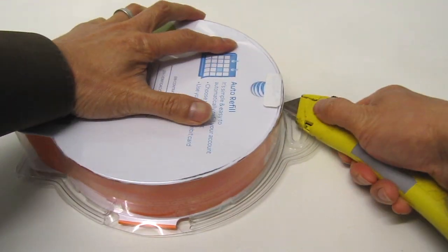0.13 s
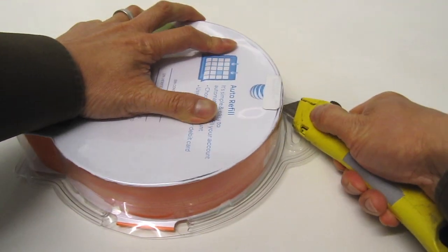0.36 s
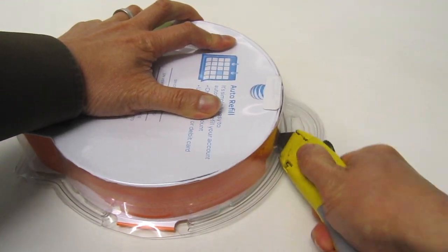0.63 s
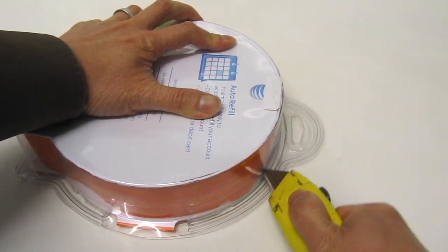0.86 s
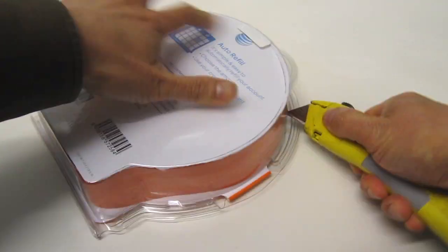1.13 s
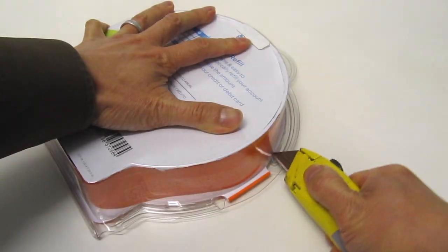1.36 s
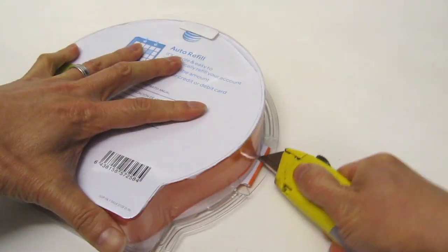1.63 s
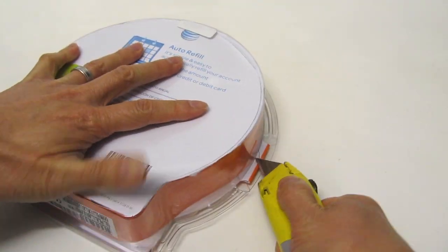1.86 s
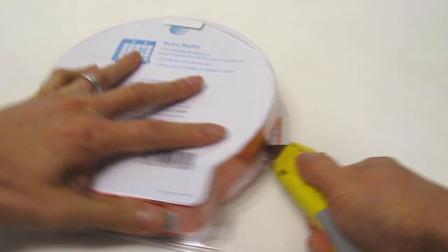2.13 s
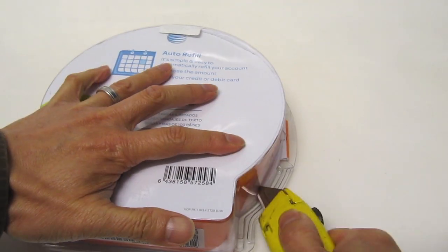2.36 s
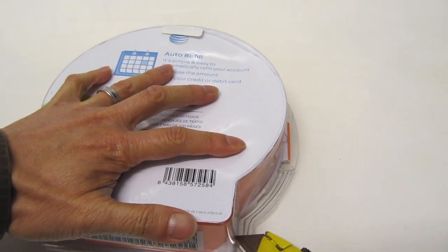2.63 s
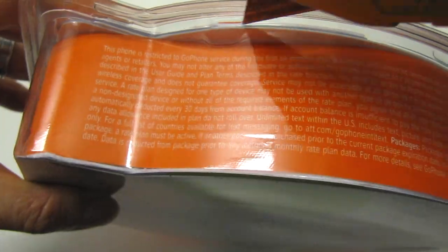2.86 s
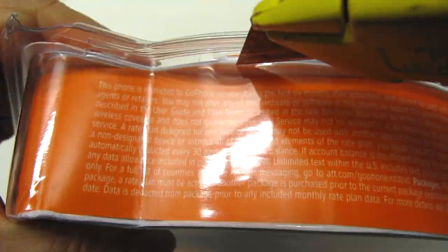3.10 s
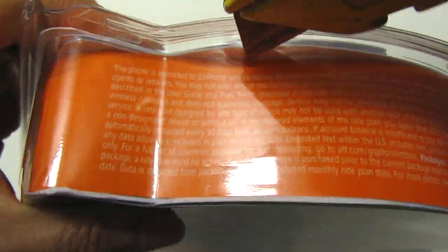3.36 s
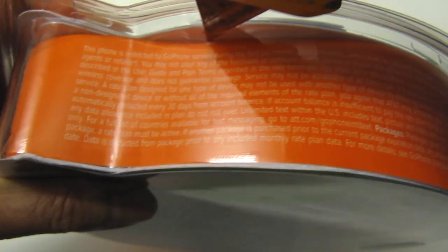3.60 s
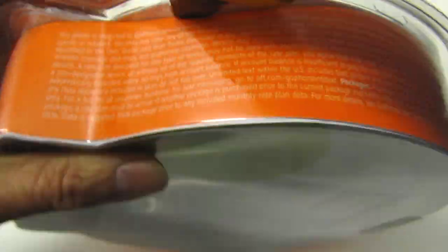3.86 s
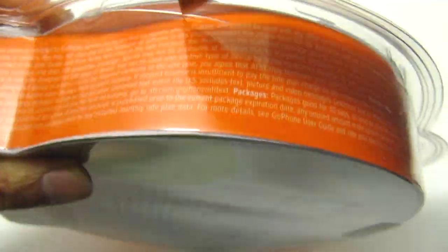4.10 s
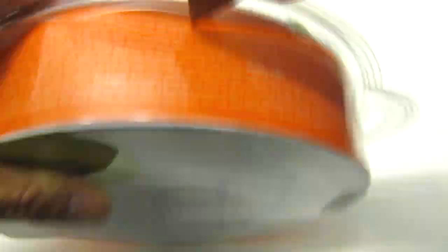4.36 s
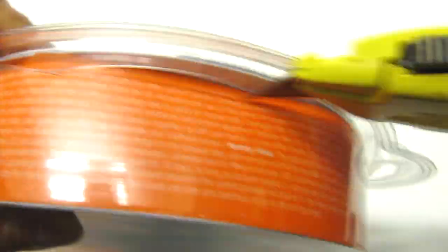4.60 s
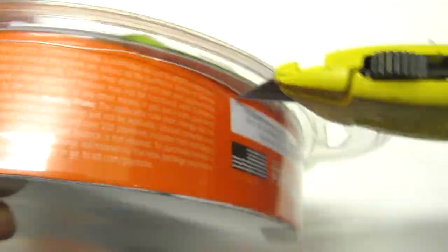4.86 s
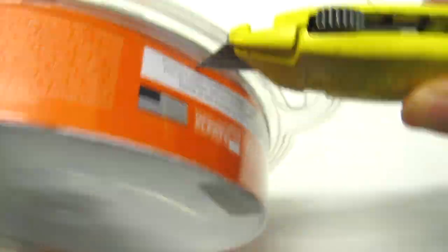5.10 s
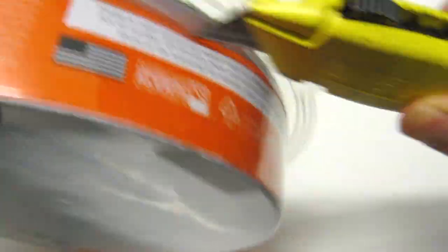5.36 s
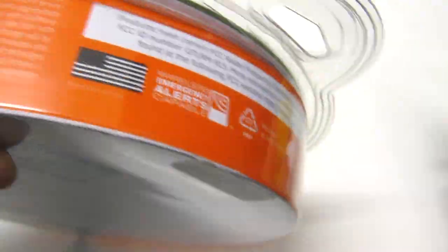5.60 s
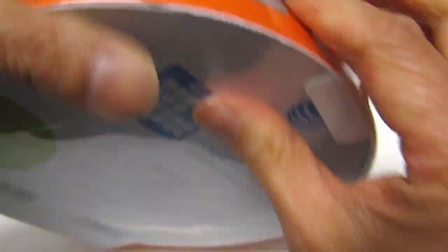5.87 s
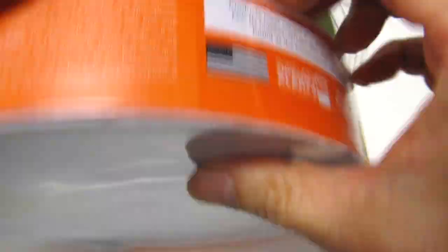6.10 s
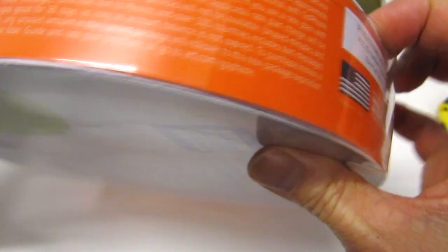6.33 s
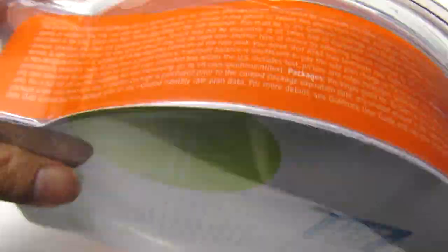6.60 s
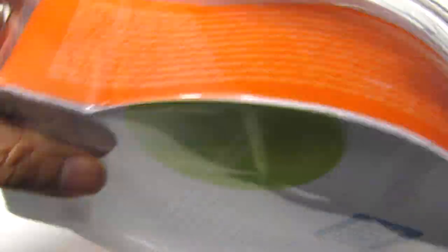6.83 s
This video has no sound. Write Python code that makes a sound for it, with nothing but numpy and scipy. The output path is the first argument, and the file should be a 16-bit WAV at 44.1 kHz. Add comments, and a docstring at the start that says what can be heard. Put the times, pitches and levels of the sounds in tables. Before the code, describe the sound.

Close, dry mono sound of stiff clamshell plastic being cut indoors. Isolated bright cracks with quiet gaps give way to a loud snap cluster, then increasingly frequent clicks and pops. Late on, a short wavering stick-slip squeak leads into a tiny rising whistle, dense crackling, gritty strokes and another very brief squeak. Light rustling, small bumps and soft room rumble continue throughout.

```python
"""A utility knife is worked through a hard plastic clamshell package close to a mono microphone.
Separate snaps and juddering clicks, bursts of fracture noise ringing a damped shell, come first; then
scrapes of filtered grit and low sine knocks join them. After more snapping the blade squeaks as a train of
slip pulses, whistles upward as a sine sweep and squeaks again amid dense snaps and a last scrape.
Throughout lie noise rumble, hums and hiss of a quiet room, and the rustle, ticks and bumps of handling."""
import sys
import numpy as np
from scipy import signal
from scipy.fft import rfft, irfft, next_fast_len
from scipy.io import wavfile
from scipy.ndimage import uniform_filter1d

SR = 44100
rng = np.random.default_rng(int(sys.argv[2]) if len(sys.argv) > 2 else 0)


def how_loud(loudness_db):
    """Turn decibels into a plain amplitude multiplier (0 dB gives 1, 20 dB gives 10)."""
    steps = np.asarray(loudness_db, float) / 20
    return 10 ** steps


def store_pcm(level_fs):
    """Save levels as 16-bit WAV."""
    pcm = np.round(np.clip(level_fs, -1, 1) * 32767).astype(np.int16)
    wavfile.write(sys.argv[1], SR, np.atleast_2d(pcm).T)


N = 307377

# Colour of plastic rubbed by hand or blade. Each row: frequency in Hz, relative level in dB.
RUSTLE_COLOUR = [(90, -21), (280, 11), (650, -2), (1000, -0.5), (2600, 2), (4300, -8.5), (8000, -29.5)]
# Colour of the bright hiss in scrapes and background. Each row: frequency in Hz, relative level in dB.
HISS_COLOUR = [(1500, -32.5), (4000, -1.5), (6000, -1.5), (9700, 5), (12000, -5.5), (15500, -26.5),
               (16000, -45)]


def evened(x):
    """Scales to rms 1."""
    return x / np.sqrt(np.mean(x ** 2) + 1e-20)


def add(mix, s, sound):
    """Mixes a sound in at s seconds."""
    part = mix[round(s * SR):][:len(sound)]
    part += sound[:len(part)]


def coloured(x, points):
    """Filters by a spectrum of (Hz, dB) points, then scales to rms 1."""
    size = next_fast_len(len(x) + 512)
    point_hz, point_db = np.transpose(points)
    hz = np.fft.rfftfreq(size, 1 / SR)
    gain = how_loud(np.interp(np.log(hz + 1), np.log(point_hz), point_db))
    return evened(irfft(rfft(x, size) * gain, size)[:len(x)])


def lumps(size, span_s, depth_db):
    """A randomly wandering gain."""
    span = max(round(span_s * SR), 1)
    wander = uniform_filter1d(uniform_filter1d(rng.standard_normal(size), span), span)
    return how_loud(depth_db * evened(wander))


def random_hits(per_s, spread_db):
    """Impulses of random size at random moments, per_s a second on average."""
    size = how_loud(spread_db * np.minimum(rng.exponential(1, N), 2.5))
    return size * (rng.random(N) < per_s / SR)


def snap(thud_db, crack_db, tear_s=0.00095, tear_db=-5, shake_s=0.0045, shake_db=-21):
    """One break, smaller fractures and a shudder ring the heavily damped shell; the ring peaks near 1."""
    # What the shell rings with. Each row: nominal frequency in Hz, level in dB before
    # scaling by 1/sqrt(t60), t60 in seconds.
    shell_modes = [(490, -18, 0.0019), (1103, 3.5, 0.012), (2185, 3.5, 0.0017), (2894, -2, 0.0016),
                   (4536, 2, 0.0016), (6820, -2, 0.0029), (8570, 10, 0.0012), (12600, -44, 0.0018)]
    boom_nominal_hz, boom_db, boom_t60 = 327, -14, .04  # the hollow package booms under each thud
    hz, db, t60 = np.transpose(shell_modes)[:, :, None]
    t = np.arange(1800) / SR

    hz_here = hz * (1 + .09 * rng.standard_normal(hz.shape))  # each spot is tuned differently
    modes = (how_loud(db - 60 * t / t60) / np.sqrt(t60) * np.sin(2 * np.pi * hz_here * t)).sum(0)

    tear = how_loud(tear_db) * np.exp(-t / tear_s)
    shudder = how_loud(shake_db) * np.exp(-t / shake_s)
    fractures = rng.standard_normal(len(t)) * (tear + shudder)
    fractures *= 1 - np.exp(-t / .0003)  # the tear gathers before it gives
    fractures[14] = -1  # the main break
    ringing = signal.fftconvolve(modes, fractures)[:len(t)]

    # thud, ring and crack; thin plastic radiates no deep bass
    out = 0
    for low_hz, high_hz, level_db in ((470, 1500, thud_db), (1500, 5500, 0), (5500, 15500, crack_db)):
        sos = signal.butter(3, (low_hz, high_hz), "bandpass", fs=SR, output="sos")
        part = signal.sosfilt(sos, ringing)
        peak = np.sqrt(2 * uniform_filter1d(part ** 2, 50).max())
        out = out + how_loud(level_db) * part / peak

    boom_hz = boom_nominal_hz * hz_here[0] / hz[0]
    boom = how_loud(thud_db + boom_db - 60 * t / boom_t60) * np.sin(2 * np.pi * boom_hz * t)
    return out + boom


def snaps():
    """The separate snaps, each a fresh fracture of the shell."""
    # Each row: start in seconds, ring level in dB, thud relative to it in dB, crack relative to it in dB.
    snap_rows = [(.014, -35, -26, -3), (.064, -37, -20, 1.5), (.326, -29, 1.5, -7.5),
                 (0.5057, -34.5, -2.5, -9), (0.6235, -12, -7.5, 6.5), (0.6357, -22.5, -8.5, -4.5),
                 (0.648, -31.5, -6, -5.5), (0.7015, -45.5, -1.5, -2), (0.7824, -57.5, 18, 2),
                 (.843, -50, -2, -16), (0.965, -50.5, -1, -6.5), (1.2334, -43.5, 9, -8),
                 (1.575, -36, -25, 1), (1.898, -21, -10.5, 0), (2.0248, -35.5, 3, 0),
                 (2.1034, -29.5, 2.5, -9.5), (2.12, -17.5, -7, -8), (2.2732, -33.5, -29, -16),
                 (2.3316, -34, -18, -16), (2.5089, -33, -7.5, -22), (2.6979, -33.5, -6, -18),
                 (2.7847, -17.5, -9, -19), (2.793, -17, -30, 6), (2.7973, -8.5, -13.5, -2),
                 (3.171, -19.5, -11, 3), (3.2014, -19, -38, -1), (3.3679, -34.5, -21, 0),
                 (3.3839, -30, -38, -13.5), (3.4661, -32.5, -2.5, -8), (3.4733, -26, -10.5, -6.5),
                 (3.527, -27.5, -7, -1), (3.5674, -14, -9.5, 4.5), (3.6346, -34.5, -3, -11.5),
                 (3.7314, -32.5, -5, -9.5), (3.7433, -26, -7.5, -14.5), (3.8192, -34, -2.5, -0.5),
                 (3.8575, -8, -30, -5.5), (3.9048, -36, -11.5, -3), (3.9629, -30.5, -35, -4.5),
                 (4.0333, -39.5, 3, -28), (4.121, -34.5, -3, -2.5), (4.1639, -23, -36, -7.5),
                 (4.1966, -29, -22, -2.5), (4.2188, -23, -25, -5.5), (4.2401, -33.5, -12, -2),
                 (4.2468, -29.5, -6, -13), (4.256, -13.5, -54, 4.5), (4.2983, -37.5, -7, -4),
                 (4.35, -28, -38, -7.5), (4.3942, -37, -10, -5), (4.4221, -32.5, -13, -6.5),
                 (4.676, -30, -6, -2.5), (4.7152, -32, -3.5, -4), (4.784, -25, -6.5, -2.5),
                 (4.7909, -35, -2, 5), (4.8789, -30.5, -2, -9), (4.9034, -26.5, -34, -6),
                 (4.9201, -44, -27, 2.5), (5.0198, -30.5, 1.5, -3), (5.107, -34.5, -8, -1),
                 (5.1208, -37.5, 4, -25), (5.2201, -37, -16, 2), (5.2449, -29.5, -27.5, 5),
                 (5.3474, -28.5, -11, -12), (5.3825, -33.5, -19, -5.5), (5.553, -31, -6.5, -8.5),
                 (5.572, -32, -8.5, -4), (5.6268, -18, -8.5, -1), (5.634, -26.5, -2.5, 3.5),
                 (5.649, -30, -30, -8), (5.656, -27.5, -24, 1), (5.688, -31, -25, -5),
                 (5.7313, -24.5, -32, 3.5), (5.7661, -41, -17, 19.5), (5.769, -21, -29, -18),
                 (5.7869, -15.5, -26, -13.5), (5.797, -28, -4, -0.5), (5.8558, -29.5, -14, 6.5),
                 (5.8656, -24, 4.5, -5.5), (5.8833, -29.5, -11, 0.5), (5.9074, -24, -6, -6),
                 (5.911, -13.5, 2.5, -6.5), (5.9265, -36.5, -18, 8.5), (5.936, -25, -12, -12),
                 (5.955, -27, -25, 4.5), (5.9665, -33, -20, 3), (5.9788, -28.5, -25, 1),
                 (6.044, -36.5, -19, 1), (6.0772, -29, -8, -15), (6.1591, -34.5, -27, 1),
                 (6.213, -27.5, -23, -10), (6.253, -40, -13, 0.5), (6.2679, -33, -17, -7.5),
                 (6.2833, -27, -12, 6.5), (6.3382, -29, -5, 4.5), (6.361, -18.5, -4.5, 7.5),
                 (6.3802, -28.5, -43, -10.5), (6.3943, -13.5, -29, 0), (6.48, -43, -31, 16.5),
                 (6.5948, -43, -8.5, -25.5), (6.6252, -13.5, -4.5, 0), (6.8254, -45, -5, -3),
                 (6.9147, -36, -16, -0.5), (6.9511, -30.5, -36, 3.5)]
    out = np.zeros(N)
    for s, ring_db, thud_db, crack_db in snap_rows:
        add(out, s, how_loud(ring_db) * snap(thud_db, crack_db))
    return out


def judders():
    """The edge judders: one spot clicks again and again, each gap longer or shorter than the last."""
    # Each row: start in seconds, length in seconds, first gap in seconds, gap growth as a ratio,
    # nominal ring level in dB, thud relative to it in dB, crack relative to it in dB.
    judder_rows = [(.148, .14, .0178, 1.075, -29, -1, -7), (4.5793, .057, .0085, 1.09, -30, -12, -5),
                   (4.8086, .024, .0098, .98, -32, -9, -5), (6.1278, .03, .0045, 1.4, -31, -7, 1),
                   (6.4375, .023, .0051, 1.24, -37, -24, 9), (6.4905, .033, .0059, 1.01, -36, -21, 9)]
    tear_s, alike = .0004, .5  # alike: weight of the click that all in one judder share
    fade_db, spread_db = -2.5, 1.5  # fade over the whole length; random spread of each click
    out = np.zeros(N)
    for start_s, length_s, gap_s, growth, ring_db, thud_db, crack_db in judder_rows:
        after_s = gap_s * (np.cumsum(growth ** np.arange(12)) - 1) / growth
        spot = snap(thud_db, crack_db, tear_s)
        for s, chance in zip(after_s, rng.standard_normal(12)):
            fresh = snap(thud_db, crack_db, tear_s)
            click = alike * spot + np.sqrt(1 - alike ** 2) * fresh
            level = how_loud(ring_db + fade_db * s / length_s + spread_db * chance)
            add(out, start_s + s, (s < length_s) * level * click)
    return out


def scrape(start_s, end_s, db, bright_db):
    """Dense grit under the sliding edge, duller or brighter with pressure."""
    size = round((end_s - start_s) * SR)
    grit = rng.standard_normal((2, size)) * lumps(size, .0007, 4)
    sound = coloured(grit[0], RUSTLE_COLOUR) + how_loud(bright_db) * coloured(grit[1], HISS_COLOUR)
    no_bass = signal.butter(2, 454, "high", fs=SR, output="sos")  # the thin edge sheds no bass
    sound = signal.sosfilt(no_bass, sound)
    return how_loud(db) * evened(sound) * signal.windows.tukey(size, .3)


def scrapes():
    """The blade slides along the plastic in short strokes of grit."""
    # Each row: start in seconds, end in seconds, level in dB before the fades, brightness in dB.
    scrape_rows = [(1.91, 1.944, -43, -3), (2.114, 2.156, -36, -6), (2.789, 2.798, -29.5, 5.5),
                   (5.012, 5.053, -47.5, 0), (5.613, 5.646, -33.5, -6), (6.186, 6.224, -41.5, -8),
                   (6.253, 6.313, -39.5, -10), (6.308, 6.396, -44, -5), (6.901, 6.985, -51, -4)]
    out = np.zeros(N)
    for row in scrape_rows:
        add(out, row[0], scrape(*row))
    return out


def squeak(rows, rough, steady_hz=1000):
    """The blade sticks and slips; each slip is a bright click, less regular when slow."""
    # Colour of the slips. Each row: frequency in Hz, relative level in dB.
    slip_colour = [(500, -17.5), (1100, -12.5), (2600, 1), (3400, -4.5), (5500, -5), (9700, 3.5),
                   (11500, -8.5), (15500, -16)]
    s, *columns = np.transpose(rows)
    t = np.arange(s[0], s[-1], 1 / SR)
    hz, db = (np.interp(t, s, column) for column in columns)
    rough = np.clip(rough + .2 * (hz < steady_hz), 0, 1)
    jitter = evened(uniform_filter1d(rng.standard_normal(len(t)), 60))
    turns = np.cumsum(hz * (1 + .1 * rough * jitter)) / SR

    pulses = 0
    for k in range(1, 40):  # harmonics, kept below 16 kHz
        pulses = pulses + np.cos(2 * np.pi * k * turns + 0.11 * k * k) * (k * hz < 16000)
    puffs = np.exp(-(turns % 1) / 0.21) * rng.standard_normal(len(t))  # a noise burst on each slip
    drive = (1 - rough) * evened(pulses) + rough * evened(puffs)
    return how_loud(db) * coloured(drive, slip_colour) * signal.windows.tukey(len(t), .04)


def squeaks():
    """Stick-slip squeaks of the blade, gliding in pitch and level."""
    # One table a squeak. Each row: time in seconds, nominal slips per second, level in dB.
    squeak_tables = [
        [(5.403, 1560, -32), (5.422, 1060, -28), (5.433, 1140, -28), (5.439, 1015, -26), (5.461, 1310, -23),
         (5.468, 1175, -23), (5.475, 1240, -24), (5.497, 550, -26), (5.508, 570, -27), (5.526, 850, -26),
         (5.546, 770, -29)],
        [(6.396, 1600, -21), (6.401, 1800, -18), (6.4065, 1600, -22)],
        [(6.418, 1700, -37), (6.429, 900, -38), (6.436, 450, -40)],
    ]
    # Each entry: base share of noise in one squeak, 0 to 1.
    noise_shares = [.14, .5, .5]
    out = np.zeros(N)
    for rows, rough in zip(squeak_tables, noise_shares):
        add(out, rows[0][0], squeak(rows, rough))
    return out


def chirp():
    """The blade tip whistles upward, a sine sweep that throbs as the tip skips."""
    start_s, length_s, from_hz, to_hz = 5.611, .0095, 6100, 12700
    level_db, rise_s, fall_s, edge_db = -8, 0.0061, 0.0043, -12.5
    t = np.arange(0, length_s, 1 / SR)
    turns = np.cumsum(from_hz + (to_hz - from_hz) * t / length_s) / SR
    edge = 1 - np.clip(np.minimum(t / rise_s, (length_s - t) / fall_s + 0.52), 0, 1)
    throb = 0.29 + 0.43 * np.cos(2 * np.pi * 540 * (t - rise_s))
    out = np.zeros(N)
    add(out, start_s, how_loud(level_db + edge_db * edge) * throb * np.sin(2 * np.pi * turns))
    return out


def knocks(t60=.03, rise_s=.002):
    """The hollow package bumps the table with a low, soft note."""
    # Each row: start in seconds, level in dB before the soft rise, frequency in Hz.
    knock_rows = [(2.102, -24, 308), (2.145, -23, 290), (3.746, -26.5, 298), (5.019, -27, 390),
                  (5.14, -31.5, 366)]
    out, t = np.zeros(N), np.arange(4000) / SR
    for s, db, hz in knock_rows:
        envelope = how_loud(db - 60 * t / t60) * (1 - np.exp(-t / rise_s))
        add(out, s, envelope * np.sin(2 * np.pi * hz * t))
    return out


def reflections(x, t60=0.072, level_db=-19):
    """Table top and walls return a short dull tail, made of decaying noise."""
    t = np.arange(8000) / SR
    tail = coloured(rng.standard_normal(len(t)), [(200, 24), (4000, -4.5), (16000, -19.0)])
    tail = tail * how_loud(-60 * t / t60) * (t > .002)
    return how_loud(level_db) * signal.oaconvolve(x, tail / np.linalg.norm(tail))[:N]


def ticks():
    """Small random creaks of the shell under the hands, at 16 spots, rms 1."""
    hits = random_hits(per_s=120, spread_db=6)
    patch = rng.integers(0, 16, N)
    out = np.zeros(N)
    for k in range(16):
        creak = snap(2 - k % 4 * 3, -6 - k // 4 * 4)
        out += signal.oaconvolve(hits * (patch == k), creak)[:N]
    return evened(out)


def bumps(t60=.025):
    """Small low bumps of the package shifting on the table, on eight decaying notes, rms 1."""
    hits = random_hits(per_s=30, spread_db=4)
    patch, t = rng.integers(0, 8, N), np.arange(2000) / SR
    out = np.zeros(N)
    for k, hz in enumerate(np.geomspace(110, 420, 8)):
        note = how_loud(-60 * t / t60) * np.sin(2 * np.pi * hz * t)
        out += signal.oaconvolve(hits * (patch == k), note)[:N]
    return evened(out)


def background():
    """Room rumble with its hums, rustle with ticks and bumps, and a hiss that follows both."""
    # Levels over time. Each row: time in seconds, room in dB, handling in dB, both before the mix trims.
    level_rows = [(0, -55, -56), (.62, -50.5, -63.5), (.68, -63.5, -78.5), (1.1, -59.5, -70.5),
                  (1.22, -53, -62.5), (2.1, -49.5, -58), (2.79, -55.5, -58.5), (2.84, -64.5, -83),
                  (3.3, -55.5, -69.5), (3.7, -62, -57), (4.2, -65, -58), (4.45, -63.5, -70),
                  (4.85, -57, -59.5), (5.8, -54.5, -54.5), (6.4, -59, -62.5), (6.55, -71, -85),
                  (6.8, -69.5, -73), (6.97, -70, -50)]
    # Colour of the room. Each row: frequency in Hz, relative level in dB per Hz.
    rumble_colour = [(15, -9), (25, -6.5), (60, 3), (95, -6), (200, -17), (600, -20.5), (9000, -43),
                     (13000, -77.5)]
    # Low hum and faint whine. Each row: frequency in Hz, half-width in Hz, nominal dB over the rumble.
    hum_rows = [(119.5, 20, -8), (7885, 250, -20)]
    whine_follows = 0.66  # share of the room's dB changes that the hums follow

    s, *columns = np.transpose(level_rows)
    room_level, handling_level = (how_loud(np.interp(np.arange(N) / SR, s, column)) for column in columns)
    hiss_level = how_loud(-18) * room_level + how_loud(-7) * handling_level
    room_noise, handling_noise, hiss_noise = rng.standard_normal((3, N))

    room = coloured(room_noise, rumble_colour)
    steadier = evened(room_level ** (whine_follows - 1))
    for hz, width_hz, db in hum_rows:
        narrow = [(hz - width_hz, -40), (hz, 0), (hz + width_hz, -40)]
        room += how_loud(db) * steadier * coloured(rng.standard_normal(N), narrow)

    rustle = coloured(handling_noise, RUSTLE_COLOUR) * lumps(N, .004, 4.7)
    handling = how_loud(-3) * rustle + how_loud(2) * ticks() + how_loud(-4) * bumps()
    hiss = coloured(hiss_noise, HISS_COLOUR) * lumps(N, 0.043, 3.4)
    return how_loud(0.5) * room_level * room + handling_level * handling + hiss_level * hiss


def scene():
    """All sounds of the shell and blade, their reflections and the background, alike in two channels."""
    near = snaps() + judders() + scrapes() + squeaks() + chirp() + knocks()
    return np.tile(near + reflections(near) + background(), (2, 1))


def top_cut(x):
    """Nothing passes above the cut-off."""
    return signal.sosfilt(signal.butter(12, 16830, fs=SR, output="sos"), x)


def record(dry):
    """The microphone dulls the top octave and overloads softly on the loudest snaps."""
    dulled = signal.sosfilt(signal.butter(2, 12700, fs=SR, output="sos"), dry)
    overloaded = 1.001 * np.tanh(dulled / 0.9)
    return top_cut(overloaded)


dry = scene()
out = record(dry)
store_pcm(out)
```